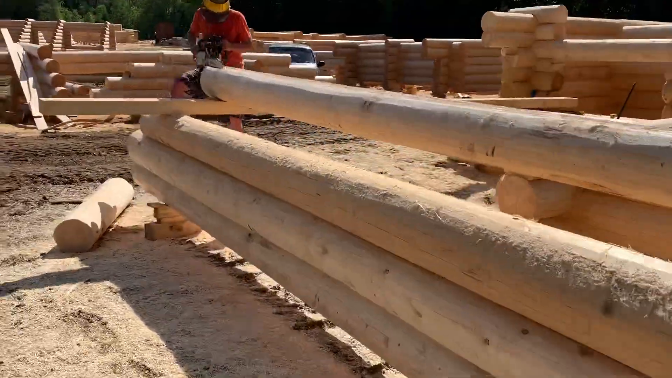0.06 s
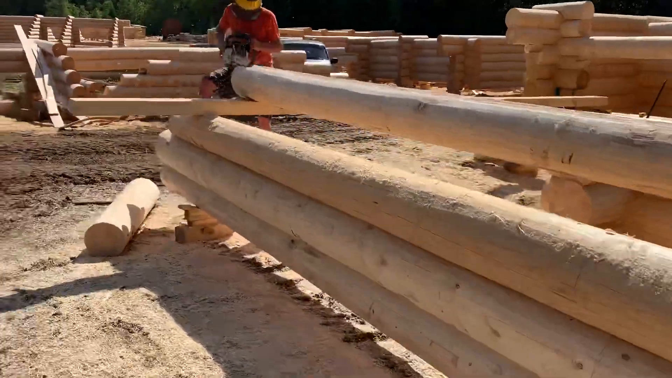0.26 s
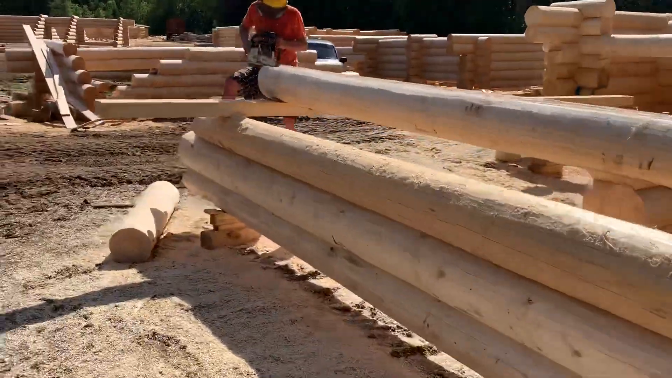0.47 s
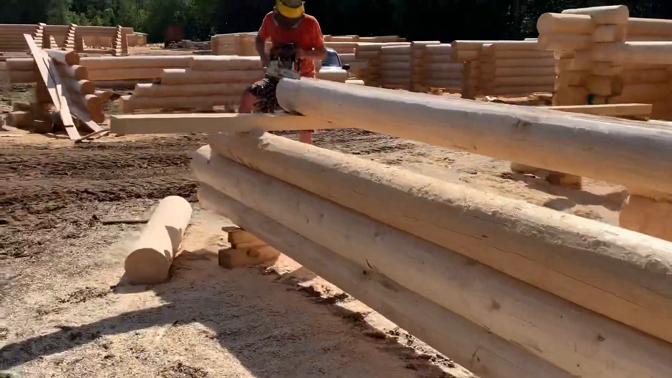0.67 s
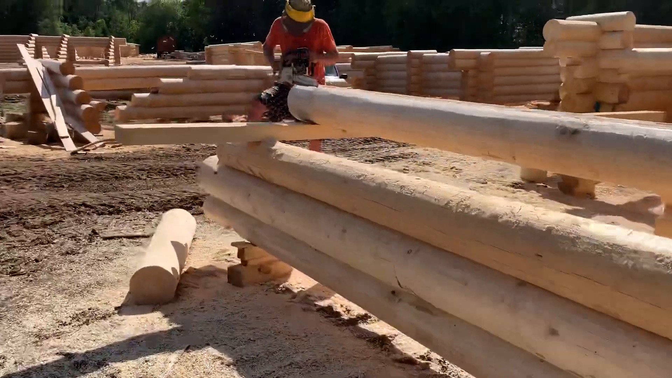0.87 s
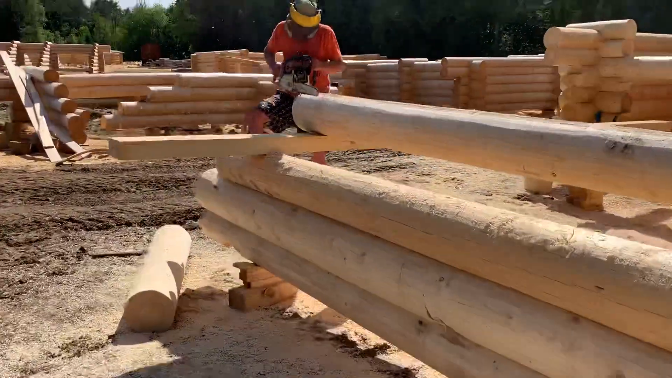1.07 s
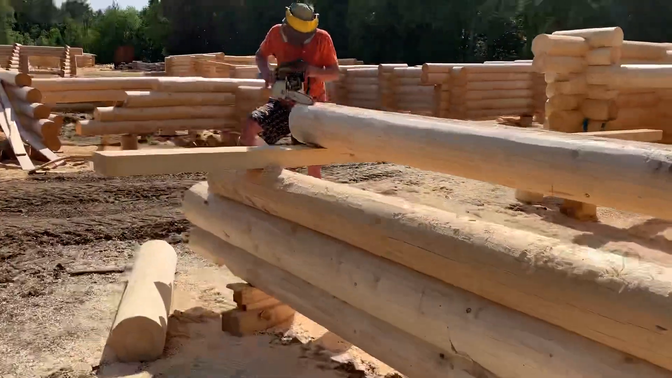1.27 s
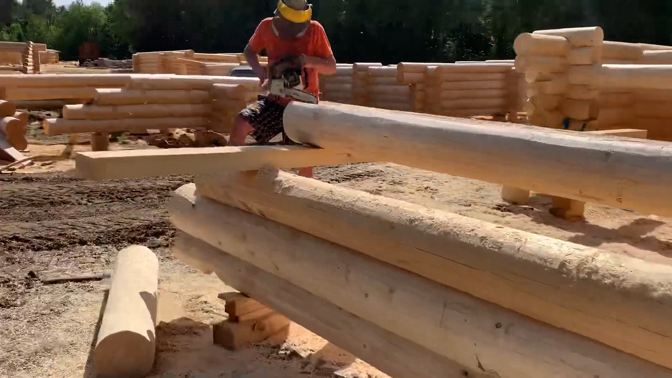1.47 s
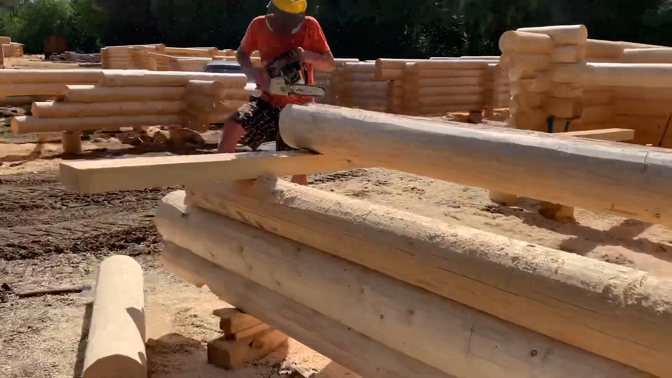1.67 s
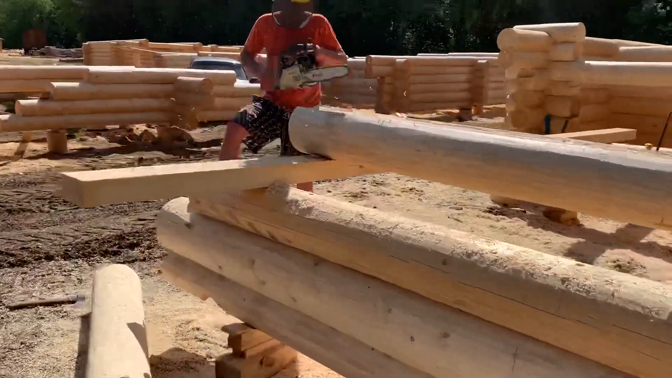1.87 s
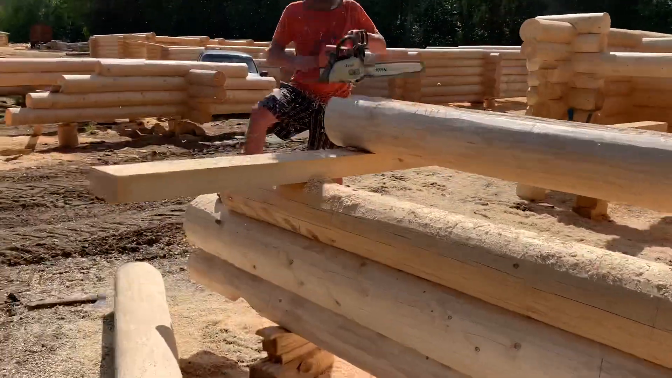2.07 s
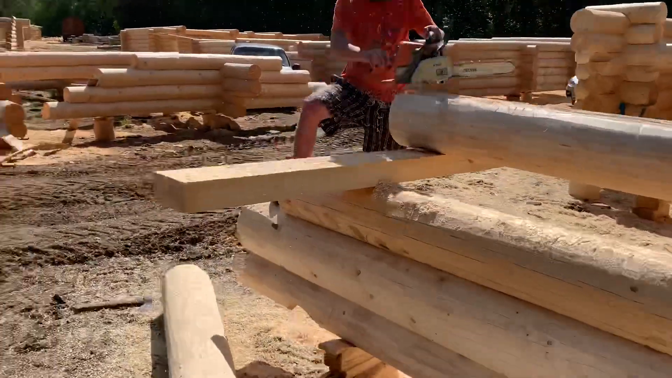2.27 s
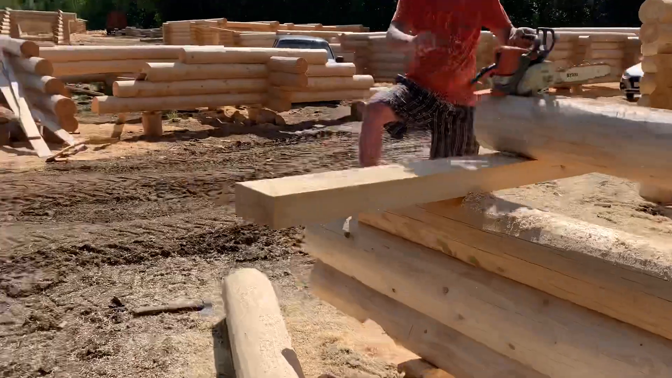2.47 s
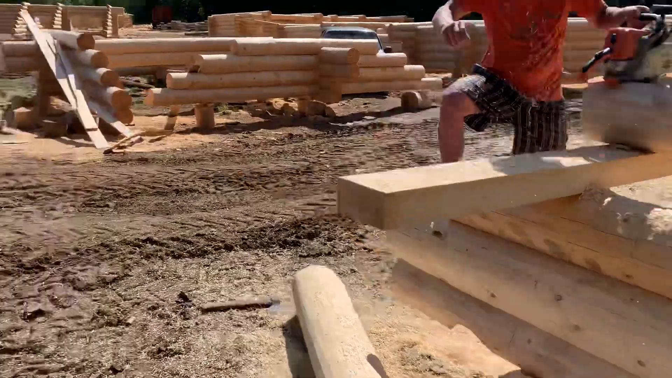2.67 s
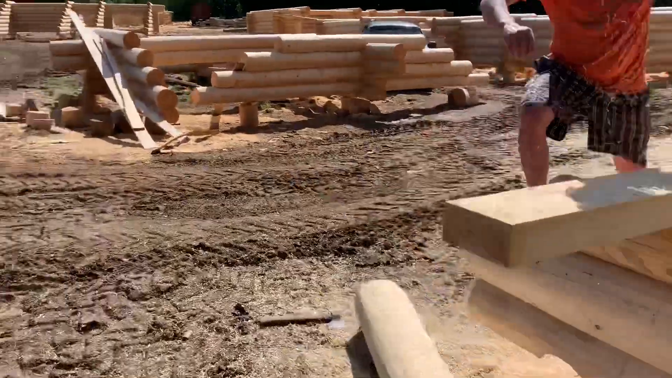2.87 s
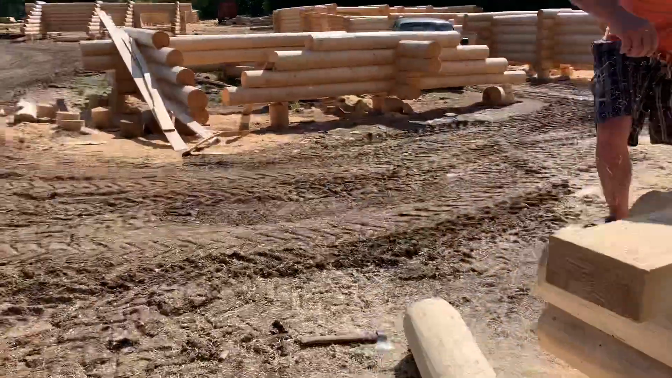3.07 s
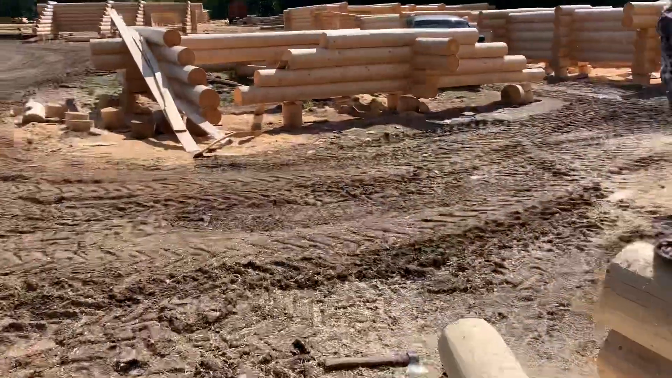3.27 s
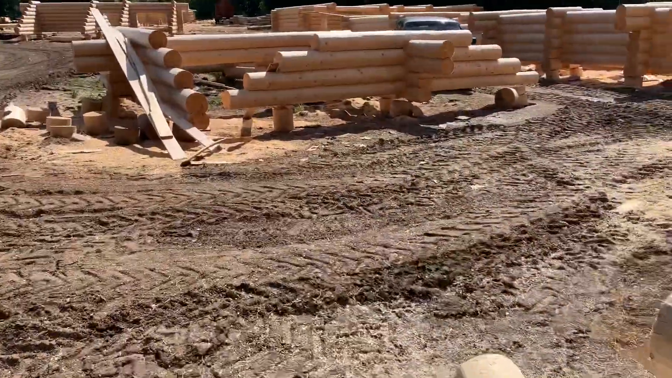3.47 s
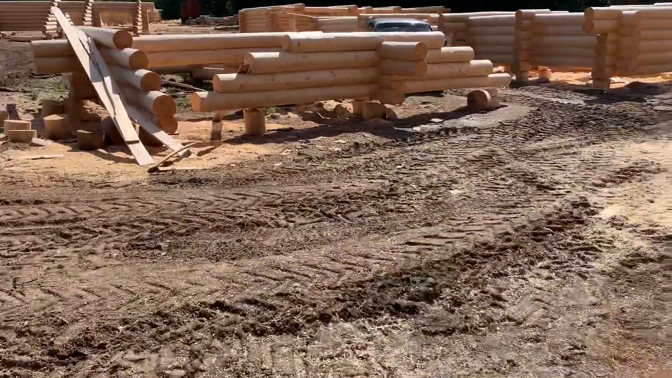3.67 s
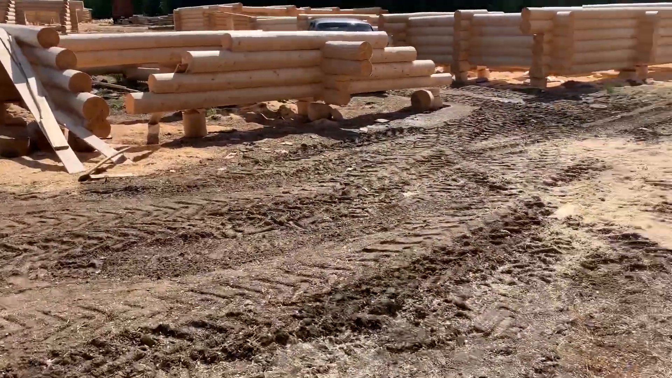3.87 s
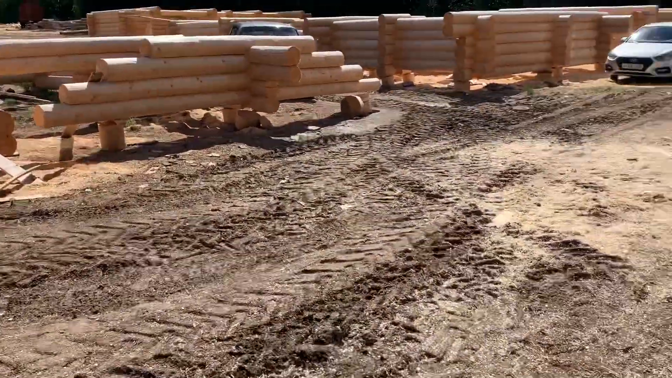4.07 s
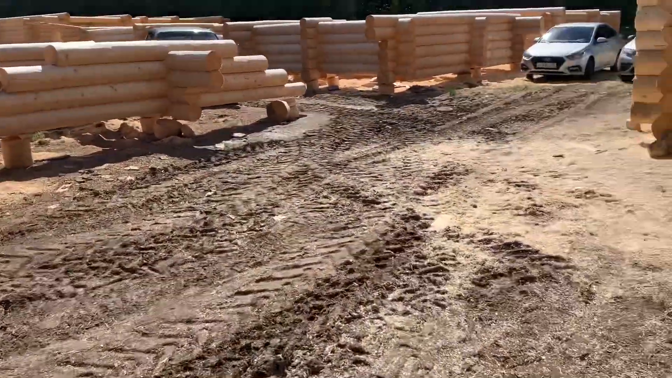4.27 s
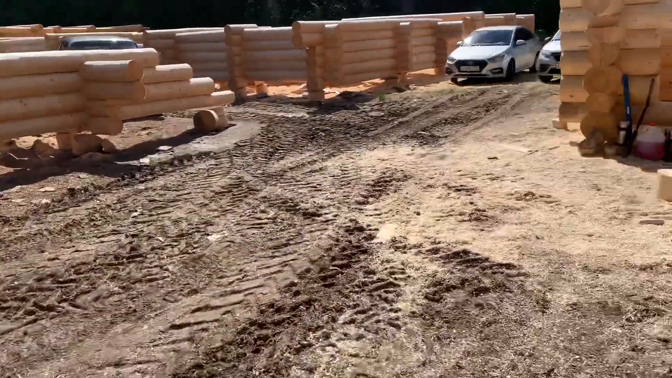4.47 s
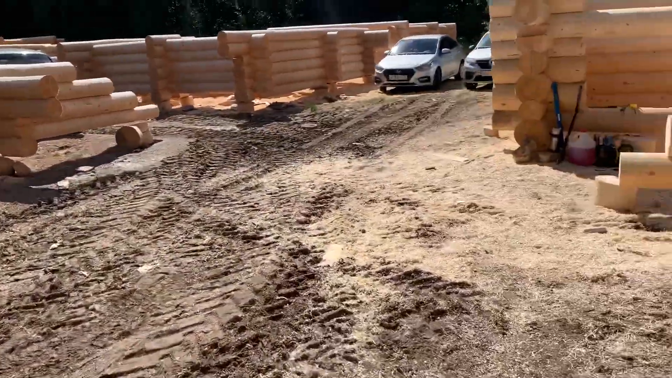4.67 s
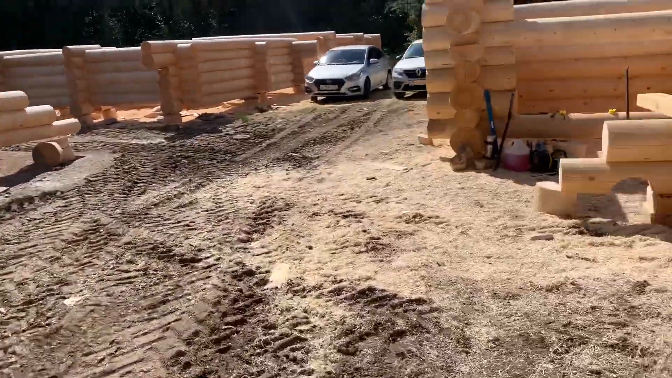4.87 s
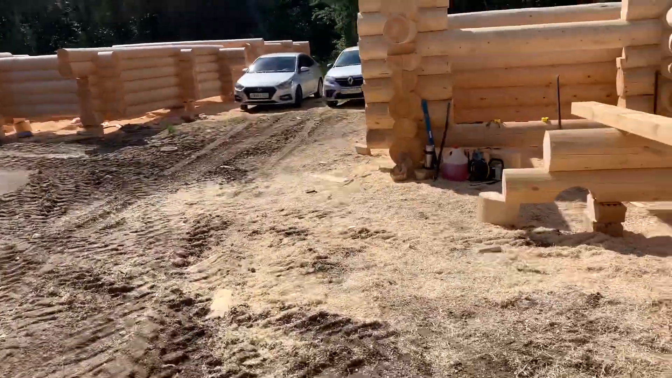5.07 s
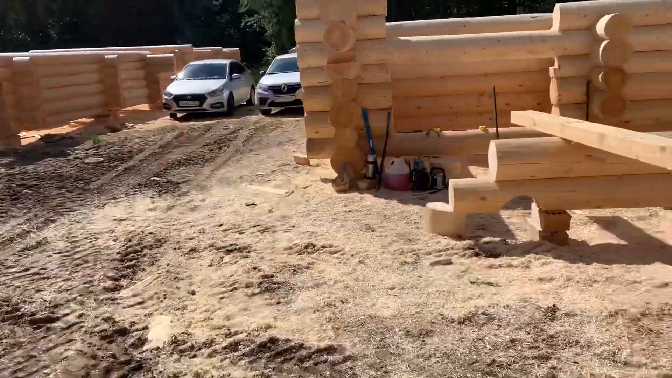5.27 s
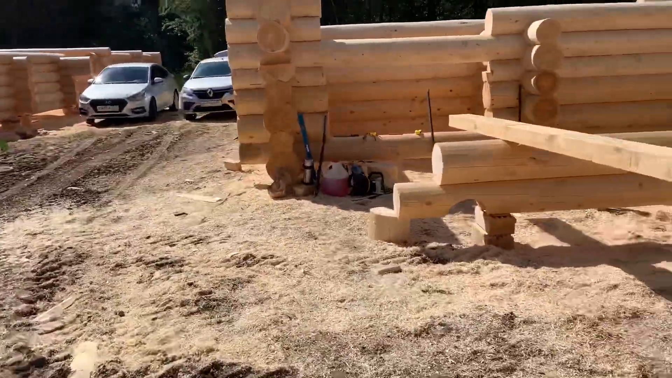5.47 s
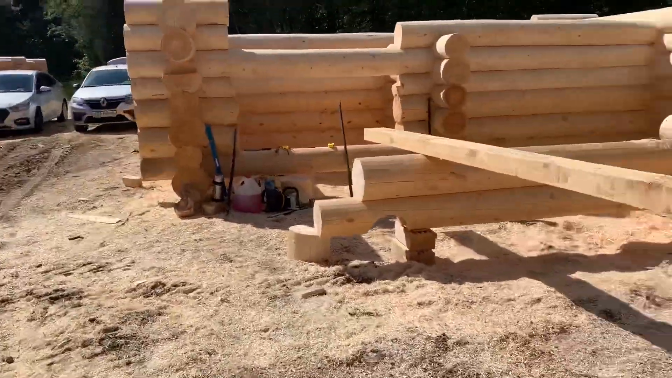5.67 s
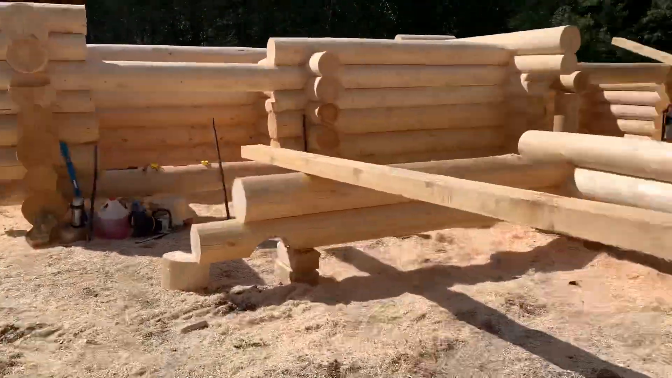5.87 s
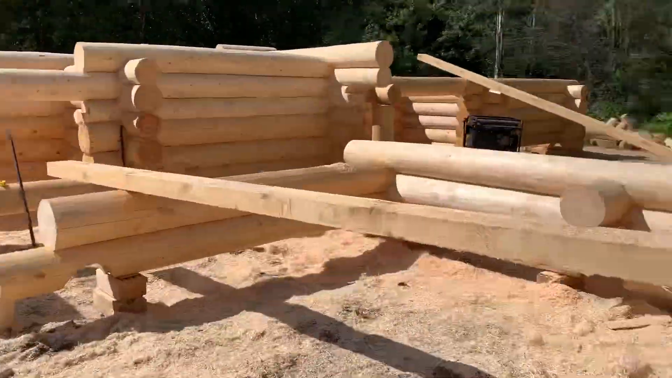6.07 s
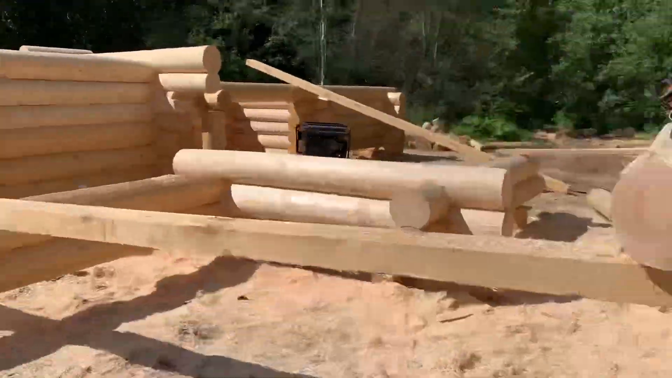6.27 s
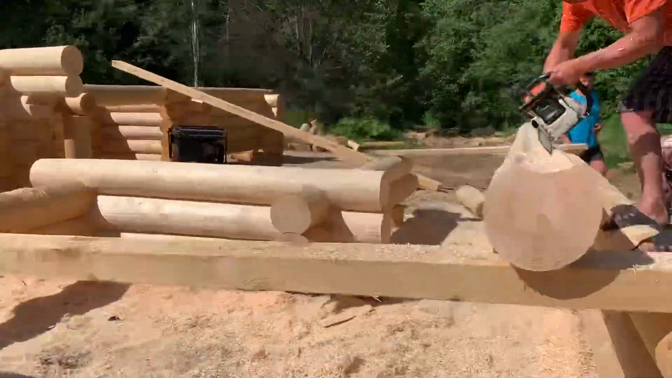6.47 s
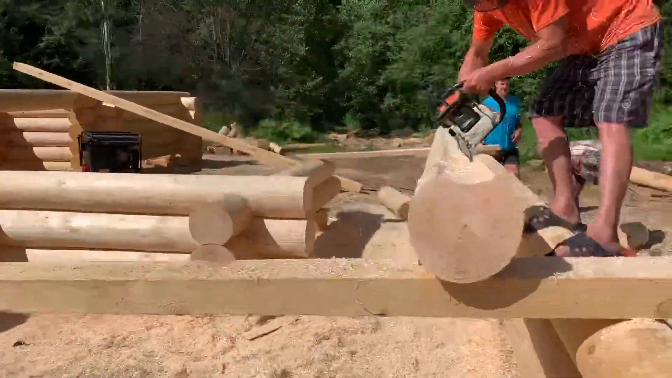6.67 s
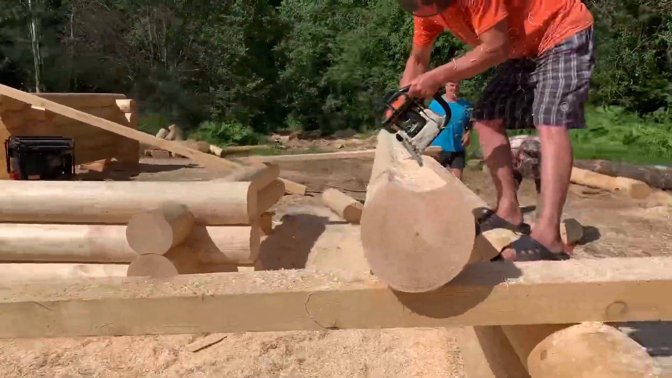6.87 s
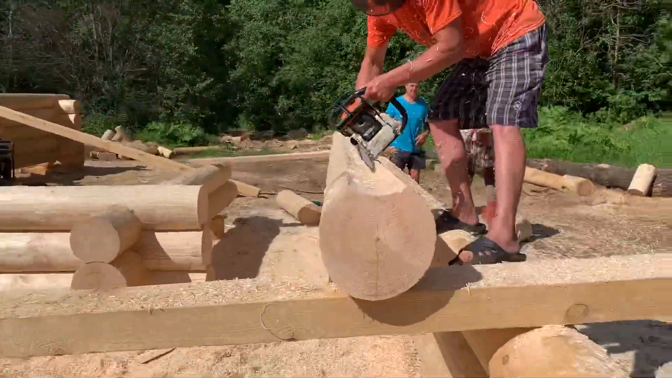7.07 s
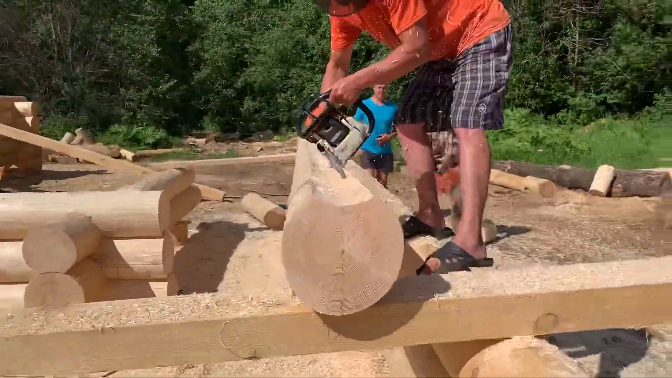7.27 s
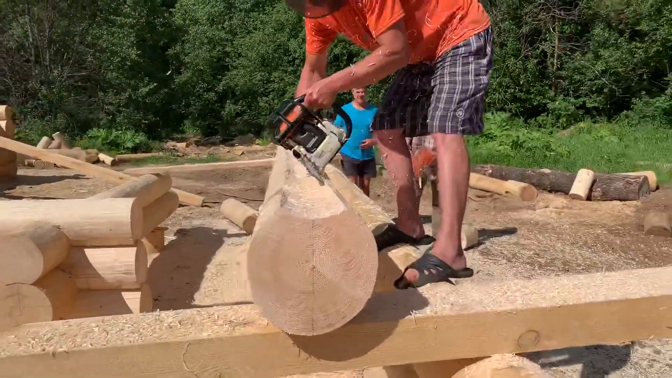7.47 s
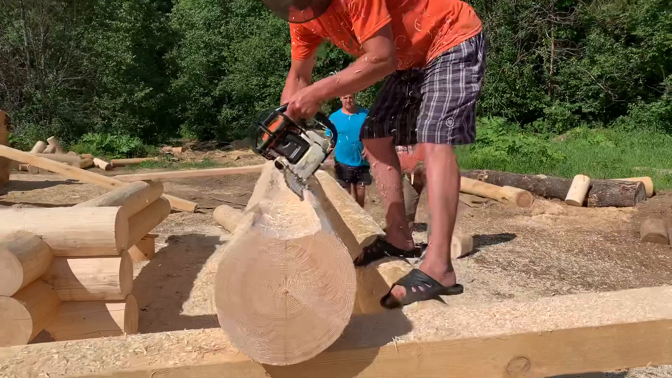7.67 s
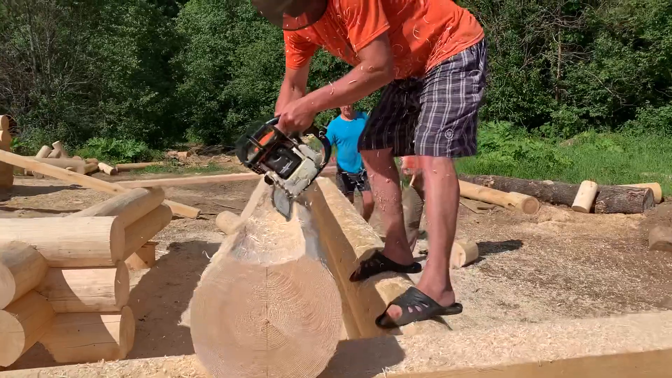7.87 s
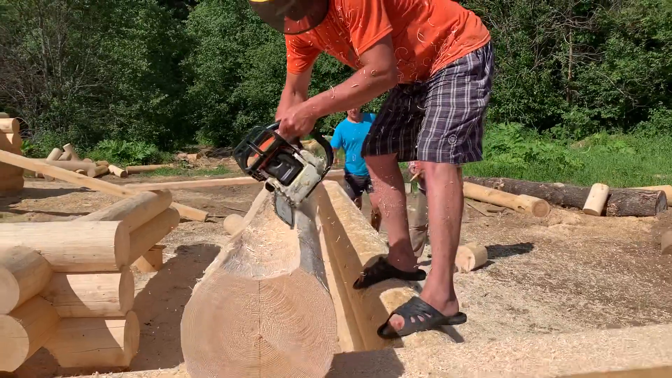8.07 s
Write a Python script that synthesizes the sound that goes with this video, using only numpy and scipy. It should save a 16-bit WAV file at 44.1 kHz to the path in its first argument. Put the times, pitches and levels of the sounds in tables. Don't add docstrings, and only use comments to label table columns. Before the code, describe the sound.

A two-stroke chainsaw cuts at high revs outdoors, winds down to a lumpy popping idle, then snaps open and bites into wood again.

```python
import sys
import numpy as np
from scipy import signal
from scipy.fft import rfft, irfft, next_fast_len
from scipy.io import wavfile
from scipy.ndimage import uniform_filter1d, map_coordinates

SR = 44100
rng = np.random.default_rng(int(sys.argv[2]) if len(sys.argv) > 2 else 0)


def bounce(signal):
    frames = np.transpose(np.atleast_2d(signal))
    limited = np.clip(frames, -1, 1)
    pcm = np.round(limited * 32767).astype(np.int16)
    wavfile.write(sys.argv[1], SR, pcm)


def elevation(decibels):
    levels = np.asarray(decibels, float)
    return 10 ** (levels / 20)


N = 358091

# freq_hz, level_db
WIND = [(20, -47), (40, -55), (65, 2), (100, -11.5), (160, -7), (300, -26.5)]
# middle_s, length_s, peak_db
GUSTS = [(.18, 0.32, -53), (1.08, 0.24, -38.5), (2.92, 0.3, -31), (2.4, 0.33, -42), (3.45, 0.31, -48.5),
         (3.907, 0.28, -36), (4.316, 0.27, -46), (4.79, 0.54, -33), (5.21, 0.29, -32), (5.616, 0.49, -30.5),
         (6.188, 0.43, -31), (6.851, 0.93, -40), (7.42, 0.22, -37)]
CALM_DB = -58

# time_s, aside (0 ahead, 1 aside)
BEARING = [(0, -.035), (.6, -.02), (.9, .01), (2.1, .02), (2.65, .66), (2.95, .75), (3.35, .78), (3.5, .94),
           (4, .95), (4.15, .89), (4.25, 1), (4.62, 1), (4.75, 1.06), (5.75, 1.08), (6, .8), (6.13, .73),
           (6.2, .5), (6.6, .37), (7, .11), (7.2, .01), (7.55, 0), (8.1, .06)]
# time_s, speed_hz
SPEED = [(0, 135.5), (.28, 137.5), (.48, 149.3), (1.2, 146.5), (1.57, 132.5), (1.97, 102.8), (2.25, 87.2),
         (2.62, 73.6), (3, 68.3), (4.48, 64.4), (6.02, 64.5), (6.32, 116.2), (6.48, 134.3), (6.84, 136),
         (7.12, 147.2), (7.37, 150.6), (7.73, 149.1), (8.12, 143.8)]
# time_s, exhaust_db, chain_db
EFFORT = [(0, -35.5, -36), (.6, -35, -29.5), (1.1, -37, -27), (1.5, -31, -28.5), (1.8, -29.5, -35),
          (2.35, -33, -35.5), (3.3, -36, -36.5), (3.75, -33, -38.5), (4.4, -30.5, -35), (4.85, -28.5, -32),
          (5.6, -32.5, -36.5), (6.01, -30.5, -31.5), (6.2, -24.5, -28), (6.57, -24.5, -22),
          (6.63, -29, -25.5), (7.1, -28.5, -22), (7.4, -28.5, -23), (8.12, -34, -25)]

# order, level_db
BITE = [(1, 0), (2, -5.5), (3, -4.5), (4, -1.5), (5, -11), (6, 2.5), (7, -4.5), (8, -12), (9, -2), (10, -6),
        (11, -35), (12, -15), (13, -5.5), (14, -4), (15, -41), (16, -9)]
CUT = [(1, 0), (2, -4), (3, -6), (4, -6), (5, -1.5), (6, -3.5), (7, -7.5), (8, -11), (9, -3), (10, -4),
       (11, -12), (12, 1.5), (13, -0.5), (14, -8), (15, -15), (16, -9)]
COAST = [(1, -10), (2, 0), (3, -17), (4, -12), (5, -1), (6, -15), (7, -15), (8, -17), (9, -22), (10, -20),
         (11, -21), (12, -21), (13, -20), (14, -22), (15, -19), (16, -23)]
COAST_END = [(1, -15), (2, 1.5), (3, -6.5), (4, -16), (5, -4.5), (6, 5), (7, 2), (8, -9), (9, -26),
             (10, -17), (11, -26), (12, -23), (13, -31), (14, -22), (15, -25), (16, -7)]
SETTLE = [(1, -7), (2, -1), (3, 10), (4, 5.5), (5, 6), (6, 9.5), (7, 4), (8, 7), (9, -30), (10, -1.5),
          (11, -2), (12, -29), (13, -34), (14, -20), (15, -12), (16, -10)]
IDLE = [(1, -11), (2, -15), (3, -8), (4, -7), (5, 0), (6, -11), (7, -14), (8, -8), (9, -18), (10, -22),
        (11, -19), (12, -27), (13, -25), (14, -25), (15, -25), (16, -30)]
IDLE_TURNED = [(1, -11), (2, -20), (3, 4), (4, 2), (5, -7.5), (6, -7), (7, -18), (8, -3.5), (9, -5),
               (10, -8.5), (11, -17), (12, -16), (13, -24), (14, -24), (15, -24), (16, -24)]
SNATCH = [(1, -6), (2, -20), (3, -0.5), (4, -10.5), (5, -7), (6, -2), (7, -11), (8, -4), (9, -9), (10, -7),
          (11, -7), (12, -13), (13, -19), (14, -29), (15, -23), (16, -31)]
PULL = [(1, -3), (2, -4), (3, -10), (4, 2), (5, -4), (6, -3), (7, -7), (8, -7), (9, -7), (10, -14),
        (11, -13), (12, -15), (13, -18), (14, -14), (15, -11), (16, -11)]
REBITE = [(1, -1), (2, -6), (3, -4.5), (4, -1.5), (5, -2), (6, 3), (7, 3.5), (8, -9), (9, -4), (10, -5),
          (11, -24), (12, -18), (13, 0.5), (14, 4), (15, -16), (16, 0.5)]
DEEP = [(1, 0), (2, -41), (3, -10), (4, -1.5), (5, -10.5), (6, -4.5), (7, -12), (8, -35), (9, -5.5),
        (10, -20), (11, -10), (12, -1.5), (13, -13), (14, -2.5), (15, -4.5), (16, -6)]
STATES = [BITE, CUT, COAST, COAST_END, SETTLE, IDLE, IDLE_TURNED, SNATCH, PULL, REBITE, DEEP]
# start_s, length_s
CHANGES = [(0.271, 0.24), (1.198, 0.56), (1.846, 0.46), (2.46, 0.13), (3.59, 0.99), (5.56, 0.38),
           (5.991, 0.052), (6.158, 0.11), (6.461, 0.061), (6.87, 0.2)]
SMEAR = [.225, .248, .198, .2, .2, .7, .25, .0, .03, .251, .251]
TWIST = [0, 0, 0, 0, 0, 0, 0, -1.8, -1.8, 0, 0]
ROUGH_DB = [-8, -9, -13, -8, -6, -12, -10, -14, -11, -8, -11]
# speed_hz, level_db
FIRST = [(64, -22), (72, -32), (88, -16.5), (115, -17), (134, -6), (148, -0.5)]
# order, level_db
UPPER = [(17, -25), (18, -15), (19, -9.5), (21, -23), (22, -20), (23, -16), (24, -20.5), (25, -15)]
# start_s, peak_db
SURGES = [(0.523, -35), (0.555, -22), (0.831, -23), (0.865, -21), (0.905, -29), (0.956, -24), (1.003, -23),
          (1.039, -24), (1.089, -20), (1.144, -23), (1.195, -23), (1.242, -21), (1.29, -26), (1.364, -26),
          (1.411, -21), (1.465, -23), (1.53, -29), (1.585, -24), (6.452, -23), (6.472, -9), (6.495, -32),
          (6.569, -30), (6.591, -23), (6.672, -33), (6.715, -31), (6.796, -21), (6.819, -30), (6.885, -17),
          (6.907, -23), (6.999, -21), (7.048, -20), (7.138, -30), (7.292, -29)]
SURGE_RISE_S, SURGE_FALL_S, SURGE_DB = 0.0035, 0.0041, -11.5

# start_s, peak_db, relight_turns
POPS = [(2.132, -37, 3), (2.198, -32, 4), (2.273, -46, 20), (2.43, -32, 20), (2.51, -27.5, 20),
        (2.573, -32, 20)]
# start_s, peak_db, relight_turns
FIRES = [(2.64, -27, 3.4), (2.795, -27, 5), (2.909, -27, 3.4), (3.008, -34, 4), (3.125, -29, 4),
         (3.187, -27.5, 3), (3.29, -26, 3), (3.394, -26.5, 4), (3.513, -25.5, 9), (3.573, -25.5, 3),
         (3.693, -41, 3), (3.782, -29, 5), (3.902, -24, 4), (4.036, -26, 9), (4.098, -30, 9),
         (4.19, -24, 9), (4.294, -25, 5), (4.421, -22.5, 3), (4.514, -23, 4), (4.623, -27, 4),
         (4.73, -23, 9), (4.825, -22, 9), (4.886, -25, 9), (4.979, -26, 3), (5.074, -20, 9),
         (5.15, -20.5, 3), (5.292, -18, 4), (5.478, -23.5, 9), (5.523, -22, 9), (5.589, -17.5, 3),
         (5.726, -23, 5), (5.852, -24, 9), (5.913, -27, 9), (5.975, -27, 9), (6.021, -28, 9),
         (6.037, -28, 9)]
# start_s, peak_db
BACKFIRES = [
    (6.471, -29),
    (6.568, -26),
]
# freq_hz, width_hz, level_db
MUFFLER = [(190, 30, 4.5), (400, 520, 11), (700, 450, 12), (1020, 380, 12)]
# time_s, depth
THROB = [(2.2, 0), (2.55, 2), (3.6, 1.8), (4.3, .7), (5.4, .6), (5.6, 1.5), (5.98, 1.5), (6.03, 0)]
WEAK_DB, WEAK_SPREAD_DB, REST_TURNS = 4, 1.5, 1.5
PORT_S = .0024
SLAP_S, SLAP_DB = .008, -2
INERTIA_S = .06
CLUTCH_S, CLUTCH_LENGTH_S, CLUTCH_SAG_HZ = 6.165, .07, 2.8

# freq_hz, level_db
RUMBLE = [(60, -83), (150, 15), (300, 2), (600, 11.5), (900, 9.5), (1150, -5), (1600, -42)]
RASP = [(700, -9), (1100, -5), (1500, -2), (2000, 3), (2500, -6.5), (3100, -25.5)]
CASING = [(2200, -14.5), (2800, -1), (4000, -4), (5500, 1), (7000, -2), (8200, -5.5)]
FIZZ = [(6800, -9.5), (7800, 1), (10000, -2), (12200, 0), (13500, -1.5), (15600, -6), (16100, -42)]
# mid_chain_db, db_per_chain_db, aside_db
LAYERS = [
    (-33, 0.9, 1.5),
    (-32.5, 1.28, 3.5),
    (-30, 0.74, -4.5),
]
CHAIN_MID_DB = -32
# time_s, gain_db
SHELTER = [(0, 1.5), (1.8, 0), (2.25, 3), (2.8, 2), (3.4, -5), (3.9, -9), (4.2, 4), (6, -4), (6.25, 2.5),
           (8.12, 0)]
# freq_hz, width_hz, level_db
RING_AHEAD = [(1850, 290, -16), (2350, 380, 2.5), (3410, 13, -6.5), (3634, 300, 0.5), (4380, 180, 1.5),
              (6520, 250, -4), (7550, 610, -5)]
RING_ASIDE = [(2500, 31, -32), (2880, 90, -9), (3500, 87, -20), (3624, 74, -4), (4890, 62, -6.5),
              (5640, 130, -9.5), (6440, 110, 1), (6790, 154, 2.5)]
# middle_s, length_s, freq_hz, width_hz, level_db
GLINTS = [(.9, 3.4, 1650, 96, -4), (1.175, 1.4, 3600, 270, 3.5), (4.61, 0.41, 3680, 260, 9),
          (4.9, .45, 3250, 200, 4), (5.3, 1.1, 2910, 110, 4), (4.5, .5, 5670, 250, 7),
          (7.05, 0.67, 6500, 400, 3.5), (5.4, 0.75, 2600, 290, 17), (7.9, 0.99, 2100, 190, -2)]

# freq_hz, phase_rad
LEAD_AHEAD = [(100, 0), (1000, .15), (1400, .5), (1720, .9), (2070, 1.7), (2400, 2.5), (2750, 3.14),
              (3300, 2.2), (4000, 2.45), (5000, 2.4), (6500, 1.3)]
LEAD_ASIDE = [(100, -.4), (340, -1.25), (690, -2.15), (1300, -2.85), (1600, -3.14), (2070, -3.9),
              (2750, -5.1), (3800, -6.1), (4400, -6.4), (5170, -9), (5900, -7.3)]
# freq_hz, phase_rad
LEAD_TOP = [(5000, 1.2), (7200, -1.6), (8500, -3.14), (11000, -6.28), (13450, -9.42), (15700, -12.56),
            (17000, -14)]
SPLIT_HZ = 6900
# freq_hz, gain_db
SHADE = [(100, -3.5), (300, 1), (700, -6.5), (1500, -2.5), (2500, -3), (4000, -5), (5600, -16), (7000, 0.5),
         (8000, -1)]
# freq_hz, likeness
SAME = [(60, .99), (200, .98), (700, .93), (1600, .92), (3000, .84), (5500, .5), (8000, .82), (11000, .87)]
# freq_hz, gap_db
MUTE_GAP = [(1000, 10.5), (1300, 10.5), (1650, 8), (3000, 8.5), (7000, 6.5), (9000, 3), (11000, 4.5),
            (13400, 2.8), (15000, 4)]
EDGE_HZ = 15850


def evened(x):
    return x / np.sqrt(np.mean(x ** 2) + 1e-20)


def curve(rows, t):
    s, *columns = np.transpose(rows)
    return [np.interp(t, s, c) for c in columns]


def read(points, hz):
    f, value = np.transpose(points)
    return np.interp(np.log(hz + 1), np.log(f + 1), value)


def drift(rate_hz, t, count):
    knots_hz = 40
    knots = rng.standard_normal((int(N / SR * knots_hz) + 2, count))
    lowpass = signal.butter(2, np.clip(rate_hz, .2, 19) / 20, output="sos")
    knots = signal.sosfiltfilt(lowpass, knots, axis=0)
    return [np.interp(t * knots_hz, np.arange(len(k)), evened(k)) for k in knots.T]


def state(t):
    return sum(np.clip((t - s) / length, 0, 1) for s, length in CHANGES)


def by_state(values, place):
    return np.interp(place, np.arange(len(STATES)), values)


def resonance(hz, center_hz, width_hz, level_db):
    return elevation(level_db) / (1 + (2 * (hz - center_hz) / width_hz) ** 2)


def wind():
    t, size = np.arange(N) / SR, next_fast_len(N)
    colour = elevation(read(WIND, np.fft.rfftfreq(size, 1 / SR)))
    gusts = irfft(rfft(rng.standard_normal((3, size))) * colour, size)[:, :N]
    lumps = elevation(3.6 * np.array(drift(6.1, t, count=3)))
    both, left, right = gusts * lumps
    force = elevation(CALM_DB)
    for s, length, db in GUSTS:
        force = force + elevation(db) * np.exp(-4 * ((t - s) / length) ** 2)
    return force * elevation(-5.0) * np.array([evened(both + 1.0 * left), evened(both + 1.5 * right)])


def glints(hz, frames):
    t = np.arange(frames) * 256 / SR
    total = 0
    for s, length, f, w, db in GLINTS:
        facing = np.exp(-(2 * (t - s) / length) ** 4)
        total = total + np.outer(resonance(hz, f, w, db), facing)
    return total


def noise(colour, ringing, patchy_db):
    frames, hz = N // 256 + 5, np.fft.rfftfreq(1024, 1 / SR)
    aside = curve(BEARING, np.arange(frames) * 256 / SR)[0]
    ahead_ring, aside_ring = [sum(resonance(hz, *mode) for mode in r) for r in (RING_AHEAD, RING_ASIDE)]
    rings = np.outer(ahead_ring, 1 - aside) + np.outer(aside_ring, aside)
    shape = elevation(read(colour, hz))[:, None]
    shape = shape * (1 + ringing * rings + glints(hz, frames) * min(ringing, 1))
    patches = rng.standard_normal((frames // 12 + 2, len(hz) // 6 + 2))
    grid = np.meshgrid(np.arange(frames) / 12, np.arange(len(hz)) / 6)
    patches = map_coordinates(patches, grid, order=1)
    a, b = rng.standard_normal((frames, len(hz), 2)).T
    z = (a + 1j * b) * shape / np.linalg.norm(shape, axis=0) * elevation(patchy_db * patches)
    return evened(signal.istft(z, nperseg=1024, noverlap=768)[1][:N])


def hiss(turns, fired):
    t = np.arange(N) / SR
    exhaust_db, chain_db = curve(EFFORT, t)
    chain_db = chain_db - CHAIN_MID_DB
    aside = curve(BEARING, t)[0]
    rasp_db, casing_db, fizz_db = [db + share * chain_db + aside_db * aside for db, share, aside_db in LAYERS]
    turn_index = np.maximum(turns + .25, 0).astype(int)
    luck = rng.standard_normal(int(turns[-1]) + 3)[turn_index]
    puff = np.exp(-((turns + .25) % 1) / 0.19) * elevation(6.1 * np.clip(luck, -2, 1.5))
    suck_power = np.roll(np.minimum(fired, 0), -130) ** 2
    kick = np.sqrt(abs(uniform_filter1d(suck_power, size=150))) / elevation(exhaust_db)
    rasp = elevation(rasp_db - 5.0) * noise(RASP, ringing=0.61, patchy_db=4.0)
    casing = elevation(casing_db - 0.5) * noise(CASING, ringing=2.06, patchy_db=2.5)
    fizz = elevation(fizz_db + curve(SHELTER, t)[0]) * noise(FIZZ, ringing=0, patchy_db=2.0)
    rasp = rasp * evened(1 + 0.56 * puff + 0.27 * kick)
    casing = casing * evened(1 + 1.2 * puff + 0.54 * kick)
    fizz = fizz * evened(1 + 0.5 * puff + 0.47 * kick)
    return rasp + casing + fizz


def roar():
    t = np.arange(N) / SR
    level_db = curve(EFFORT, t)[0] + by_state(ROUGH_DB, state(t))
    return elevation(level_db) * noise(RUMBLE, ringing=0, patchy_db=1.0)


def crank():
    t = np.arange(N) / SR
    sag_hz = CLUTCH_SAG_HZ * np.exp(-((t - CLUTCH_S) / CLUTCH_LENGTH_S) ** 2)
    speed_hz = uniform_filter1d(curve(SPEED, t)[0] - sag_hz, round(INERTIA_S * SR))
    turns = np.cumsum(speed_hz * (1 + 0.0023 * drift(17, t, count=1)[0])) / SR
    s = np.transpose(FIRES)[0] + PORT_S
    hand = np.exp(2j * np.pi * np.interp(s, t, turns))
    smooth_hand = np.convolve(hand, np.hanning(5), "same")
    late_turns = np.unwrap(np.angle(smooth_hand)) / (2 * np.pi)
    return turns - np.interp(t, s, late_turns)


def lit_turns(turns):
    t, rows = np.arange(N) / SR, POPS + FIRES
    s, _, every = np.transpose(rows)
    at = np.round(np.interp(s + PORT_S, t, turns))
    again = at[:-1, None] + np.round(every[:-1, None] * np.arange(1, 4))
    luck = rng.standard_normal(again.shape)
    kept = again < at[1:, None] - REST_TURNS
    s = np.interp(again[kept], turns, t) - PORT_S
    db = curve(EFFORT, s)[0] + WEAK_DB + WEAK_SPREAD_DB * luck[kept]
    return [row[:2] for row in rows] + list(zip(s, db))


def firings(fires):
    t, out = np.arange(3000) / SR, np.zeros(N + 3000)
    rows = np.array(fires + BACKFIRES)
    tunes = rng.uniform(.92, 1.08, (len(rows), len(MUFFLER)))
    for (s, db), tune in zip(rows, tunes):
        ring = 0
        for (f, w, g), k in zip(MUFFLER, tune):
            ring = ring + elevation(g) * np.exp(-np.pi * w * t) * np.sin(2 * np.pi * f * k * t + .5)
        start = round((s + PORT_S) * SR) - 20
        out[start:][:len(t)] -= elevation(db + 7.0) * ring / abs(ring).max()
    slap = uniform_filter1d(np.roll(out, round(SLAP_S * SR)), size=24)
    return (out - elevation(SLAP_DB) * slap)[:N]


def throb(fires):
    t, lit = np.arange(N) / SR, np.zeros(N)
    s, db = np.transpose(fires)
    lit[(s * SR).astype(int)] = elevation(db - curve(EFFORT, s)[0] - 4)
    swell = signal.lfilter([1], [1, -np.exp(-1 / (.028 * SR))], lit)
    return 1 + curve(THROB, t)[0] * (.25 * uniform_filter1d(swell, size=90) - .15)


def surge(t):
    start_s, peak_db = np.transpose(SURGES)
    late_s = np.maximum(t - start_s[:, None], 0)
    shape = (1 - np.exp(-late_s / SURGE_RISE_S)) * np.exp(-late_s / SURGE_FALL_S)
    return elevation(peak_db + SURGE_DB) @ shape / shape.max()


def orders(turns):
    t, coarse = np.arange(0, N, 4) / SR, turns[::4]
    exhaust_db, speed_hz, place = curve(EFFORT, t)[0], curve(SPEED, t)[0], state(t)
    table = np.array(STATES, float)[:, :, 1]
    table -= 10 * np.log10((elevation(table[:, 1:7]) ** 2).sum(1))[:, None]
    swell, slip = drift(15, t, count=30), drift(12, t, count=30)
    smear, twist = by_state(SMEAR, place), by_state(TWIST, place)
    first_db = exhaust_db + read(FIRST, speed_hz)
    out = elevation(first_db + 0.14 * swell[0]) * np.sin(2 * np.pi * coarse)
    for k in range(2, 17):
        level_db = exhaust_db - .9 + by_state(table[:, k - 1], place) + 1.6 * swell[k - 1]
        phase = smear * (k - 4) ** 2 + twist + (.1 + .012 * k) * slip[k - 1]
        out -= elevation(level_db) * np.cos(2 * np.pi * k * coarse + phase)
    out -= surge(t) * np.cos(4 * np.pi * coarse + 4 * smear)
    fast = np.clip((speed_hz - 100) / 35, 0, 1)
    for k, db in UPPER:
        level_db = exhaust_db + db + 3.0 * swell[k - 1]
        phase = .3 * k ** 2 + 0.83 * slip[k - 1]
        out += fast * elevation(level_db) * np.cos(2 * np.pi * k * coarse + phase)
    return np.sqrt(2) * signal.resample_poly(out, 4, 1)[:N]


def microphones(x):
    taps = rng.standard_normal((2, 3000)) * np.exp(-np.arange(3000) / 900.)
    echoes = signal.oaconvolve(x[None], taps / np.linalg.norm(taps[0]), axes=1)[:, :N]
    hz, t, (z, left, right) = signal.stft(np.vstack([x, echoes]), SR, nperseg=512, noverlap=256)
    aside = curve(BEARING, t)[0] + .014 * drift(12, t, count=1)[0]
    lead = np.outer(read(LEAD_AHEAD, hz), 1 - aside) + np.outer(read(LEAD_ASIDE, hz), aside)
    lead_top = np.interp(hz, *np.transpose(LEAD_TOP))[:, None]
    top = (1 / (1 + np.exp(np.clip((SPLIT_HZ - hz) / 350, -30, 30))))[:, None]
    turn = (1 - top) * np.exp(1j * lead) + top * np.exp(1j * lead_top)
    shade = elevation(np.outer(read(SHADE, hz), 0.41 + 0.49 * aside))
    same = np.clip(read(SAME, hz), 0, 1)[:, None]
    direct, scattered = np.sqrt(same), np.sqrt(1 - same)
    pair = [shade * (direct * turn * z + scattered * left), direct * z + scattered * right]
    pair = np.array(pair) * np.sqrt(2 / (1 + shade ** 2))
    return signal.istft(pair, SR, nperseg=512, noverlap=256)[1][:, :N]


def scene():
    turns = crank()
    fires = lit_turns(turns)
    fired = firings(fires)
    exhaust = (orders(turns) + roar()) * throb(fires)
    return microphones(exhaust + fired + hiss(turns, fired)) + wind()


def mute_weaker(left, right):
    window = np.sin(np.pi * (np.arange(2048) + .5) / 2048)
    stft = dict(nperseg=2048, noverlap=1024)
    hz, t, z = signal.stft([left + right, left - right], SR, window, **stft)
    edges = np.r_[0:96:8, 96:176:16, 176:320:24, 320:1025:32]
    power = np.add.reduceat(abs(z) ** 2, edges, axis=1)
    power_db = 10 * np.log10(uniform_filter1d(power, size=2, axis=2) + 1e-20)
    jitter_db = 2.2 * uniform_filter1d(rng.standard_normal(power_db.shape), size=3)
    kept = power_db[::-1] - power_db < read(MUTE_GAP, hz[edges])[:, None] + jitter_db
    kept[:, hz[edges] < 1200] = True
    kept = np.repeat(kept, np.diff(np.r_[edges, len(hz)]), axis=1)
    z = z * kept * (hz < EDGE_HZ)[:, None]
    mid, side = signal.istft(z, SR, window, **stft)[1][:, :N] / 2
    return np.array([mid + side, mid - side])


def roll_off(x):
    return signal.sosfilt(signal.butter(12, 17110, fs=SR, output="sos"), x)


def record(dry):
    low_cut = signal.butter(4, 46, "highpass", fs=SR, output="sos")
    left, right = signal.sosfilt(low_cut, dry)
    mix = mute_weaker(left, right)
    return roll_off(mix)


dry = scene()
out = record(dry)
bounce(out)
```